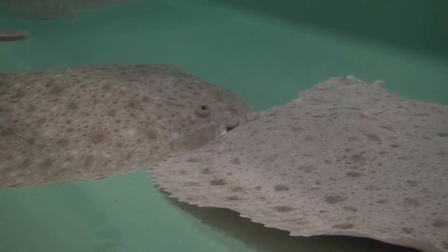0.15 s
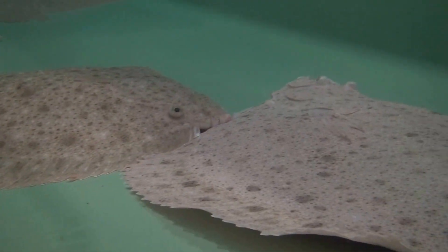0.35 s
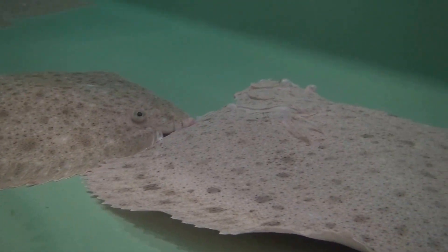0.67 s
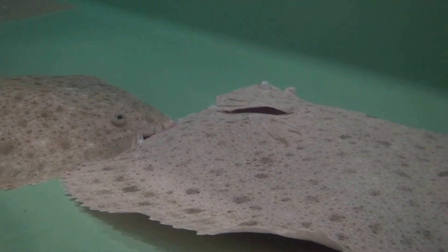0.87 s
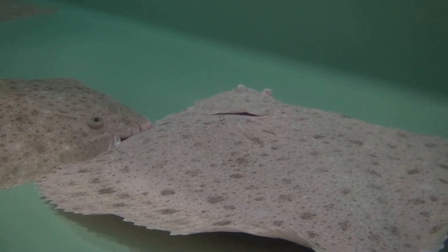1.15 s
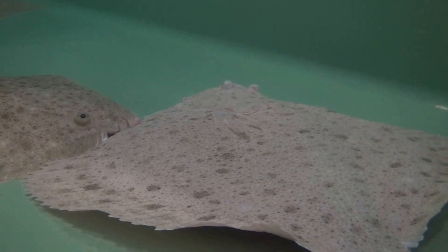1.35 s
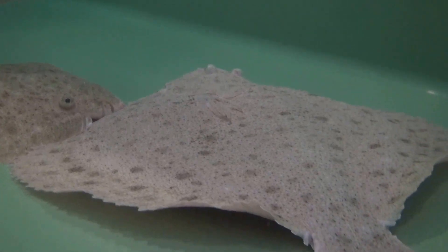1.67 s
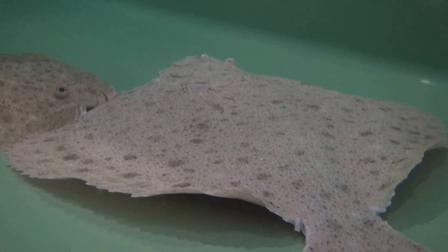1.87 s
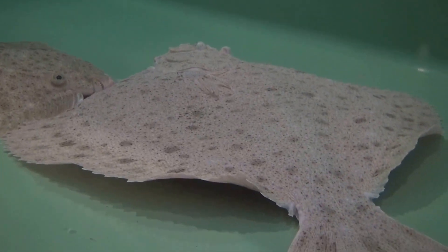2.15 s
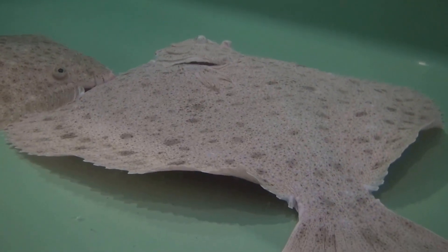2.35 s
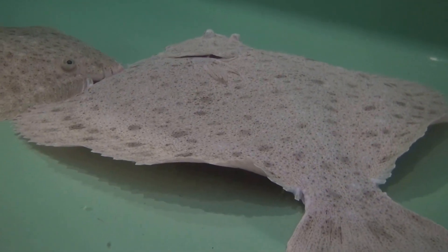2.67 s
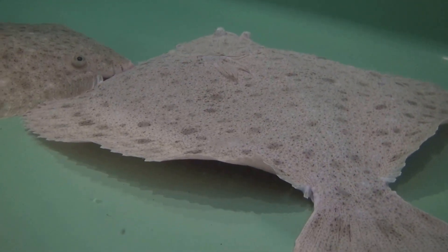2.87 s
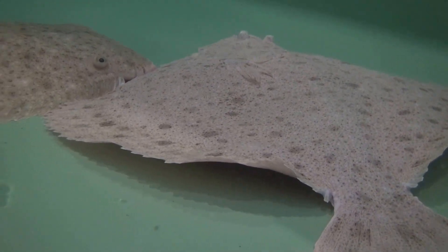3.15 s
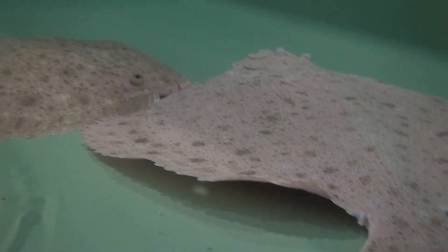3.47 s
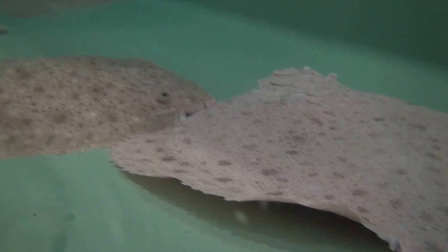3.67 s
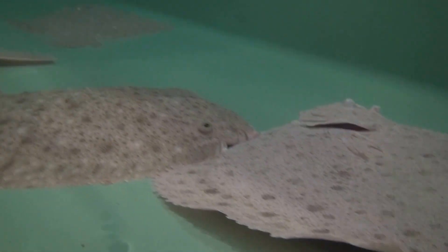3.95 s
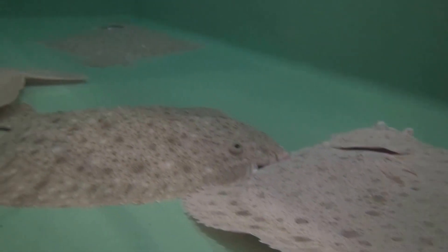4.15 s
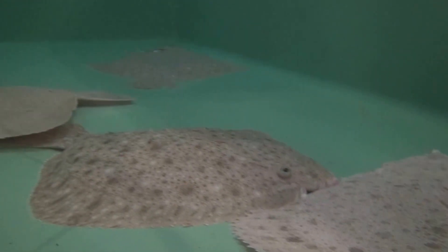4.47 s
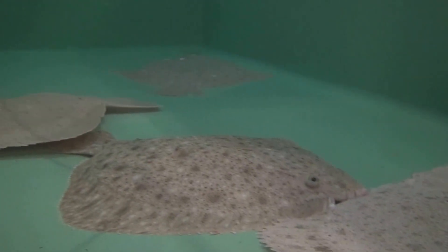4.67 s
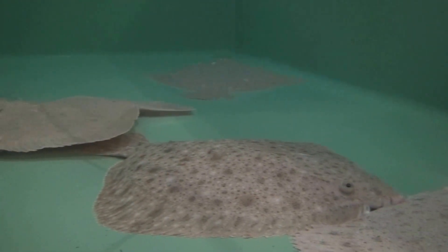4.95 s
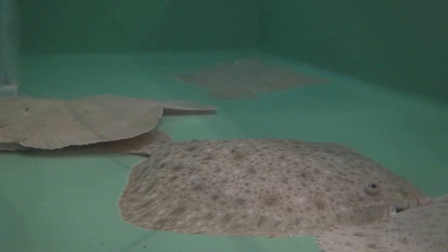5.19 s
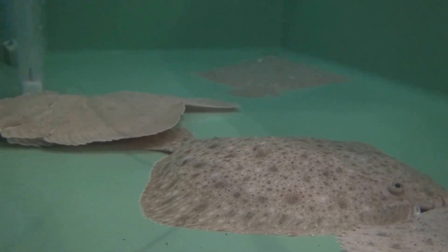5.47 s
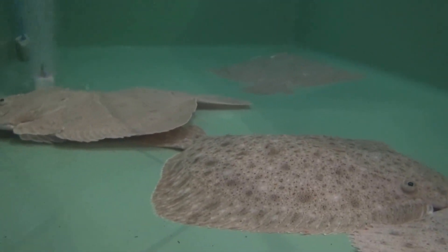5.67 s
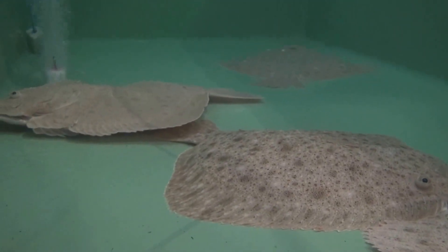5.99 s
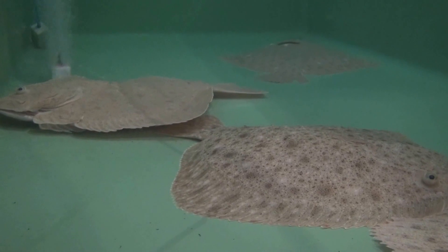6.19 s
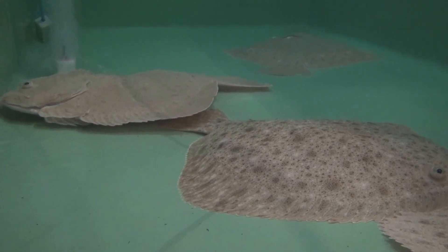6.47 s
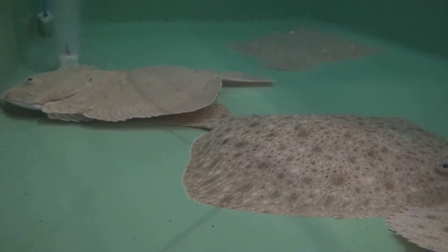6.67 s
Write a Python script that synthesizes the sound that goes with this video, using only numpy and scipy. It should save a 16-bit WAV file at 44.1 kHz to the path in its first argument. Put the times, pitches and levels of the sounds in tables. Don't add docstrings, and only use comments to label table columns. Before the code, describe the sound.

A nearly mono, close and muffled underwater sound inside an indoor fish tank, heard through a sealed housing. Deep uneven rumble and a wavering low pump hum run throughout, beneath gentle water hiss and a faint, very rapid mechanical ticking. From 0 to 1.3 seconds several dull, hollow knocks thud against the casing, each ringing low and briefly. From 1.3 to 2.9 it is calmer, the hum swelling and fading; the fine bubble fizz grows slightly near 2, and a bright plastic snap clicks at 2.6. Around 3.2 a second, weaker snap lands among renewed knocks, which crowd irregularly until about 5.5 as the rumble strengthens, then eases. From 5 to 6.2 a faint high ring flutters quickly. A last cluster of bumps comes around 5.9 to 6.3; the deepest heave fades, and the inflow rush grows nearer from 6.4 to the end at 6.8.

```python
import sys
import numpy as np
from scipy import signal
from scipy.fft import rfft, irfft, next_fast_len
from scipy.io import wavfile

SR = 44100
rng = np.random.default_rng(int(sys.argv[2]) if len(sys.argv) > 2 else 0)


def magnitude_from_level(level_db):
    exponent = np.asarray(level_db, float) / 20
    return 10 ** exponent


def inscribe(sig):
    pcm = np.round(np.clip(np.atleast_2d(sig).T, -1, 1) * 32767)
    wavfile.write(sys.argv[1], SR, pcm.astype(np.int16))


N = 301203

# (frequency [Hz], density [dB per Hz])
HEAVE_SPECTRUM = [(10, -40.5), (22, -13.5), (45, 0), (62, -4.5), (90, -27)]
# (frequency [Hz], density [dB per Hz])
SWAY_SPECTRUM = [(40, -29.5), (62, 2), (110, -2.5), (156, -0.5), (200, -8.5), (260, -37.5)]
# (frequency [Hz], density [dB per Hz])
SHELL_SPECTRUM = [(150, -31), (200, -9), (258, -3), (290, -5.5), (325, -2), (380, -29.5), (450, -52)]
# (frequency [Hz], density [dB per Hz])
UPPER_SPECTRUM = [(280, -33), (345, -0.5), (385, -2), (440, -8.5), (500, -20.5), (700, -52.5)]
# (frequency [Hz], density [dB per Hz])
WALL_SPECTRUM = [(350, -23), (450, 2), (600, -7.5), (900, -25), (1200, -45)]
# (time [s], sway level [dB])
STIR_CURVE = [(0.0, -34.5), (0.44, -36.5), (0.55, -38), (1.16, -42), (1.81, -40.5), (2.34, -44.5),
              (2.85, -37), (3.01, -39), (3.25, -35.5), (3.37, -34), (3.82, -33.5), (4.17, -36.5),
              (4.37, -40), (4.75, -37), (5.95, -37.5), (6.14, -36), (6.75, -38), (6.83, -38.5)]
# (time [s], jet level [dB])
INFLOW_CURVE = [(0, -68), (1.3, -61.5), (1.8, -64), (2.7, -72.5), (5.6, -61.5), (6, -61), (6.4, -52),
                (6.83, -52.5)]
# (frequency [Hz], level re twelfth order [dB], pitch wander [Hz])
PUMP_ORDERS = [(24.3, -7.5, 0.23), (218.4, -11, 0.76), (289.7, 3.5, 2.493)]
# (time [s], level [dB])
HUM_CURVE = [(0.1, -38), (1.1, -45), (1.43, -35), (1.84, -41), (2.13, -34.5), (2.47, -39.5), (2.79, -33),
             (2.95, -44), (3.31, -32), (3.5, -48), (3.82, -36), (4.32, -52.5), (4.57, -33.5), (4.89, -35),
             (5.3, -45), (5.65, -35), (6.26, -34.5), (6.45, -41.5)]
# (frequency [Hz], density [dB per Hz])
FLOW_SPECTRUM = [(350, -16.5), (600, -4.5), (889, -7.5), (1060, -2.5), (1210, -3), (1330, -7), (1640, -6),
                 (2010, -16.5), (2300, -18), (2990, -50.5), (5060, -120)]
# (frequency [Hz], density [dB per Hz])
FIZZ_SPECTRUM = [(1120, -29.5), (1900, -4), (2010, -18), (2530, -1), (2720, -6.5), (2920, -3.5), (3130, -7),
                 (3470, -1.5), (3990, -12.5), (4300, -12.5), (5590, -45), (9460, -120)]
# (frequency [Hz], density [dB per Hz])
AIR_SPECTRUM = [(2350, -35.5), (4000, -13), (4480, -7), (4880, 2), (5310, -6), (5900, 0.5), (6280, -2),
                (6650, -0.5), (7200, -3.5), (7700, -6), (8610, -12.5), (11000, -16.5), (15100, -18.5),
                (15600, -22)]
# (time [s], shell level [dB], sway level [dB])
INWARD_KNOCKS = [(0.0584, -10, -19.5), (0.2079, -8.5, -15.5), (0.3048, -22, -18.5), (0.557, -11, -16),
                 (1.2564, -8, -16.5), (3.4107, -20, -39), (3.8533, -26, -28), (3.9173, -18.5, -20),
                 (4.2256, -31, -22), (4.8717, -20, -21.5), (5.9303, -36, -19), (5.9777, -14.5, -32),
                 (6.2024, -15.5, -24), (6.2861, -21.5, -22)]
# (time [s], shell level [dB], sway level [dB])
OUTWARD_KNOCKS = [(0.0026, -19.5, -18.5), (0.8063, -19.5, -41), (0.83, -17, -42), (0.9717, -16, -15),
                  (2.9391, -22, -41), (3.2296, -11, -34), (3.2604, -16, -32), (3.2991, -10.5, -43),
                  (3.442, -18, -15), (3.4932, -9, -21), (3.5168, -17, -26), (3.632, -15, -27),
                  (3.7482, -17.5, -37), (3.967, -17.5, -28), (4.0568, -16, -29), (4.1674, -19.5, -20),
                  (4.201, -19.5, -39), (4.306, -15.5, -26), (4.5168, -15.5, -37), (4.5832, -16.5, -21),
                  (4.6898, -17, -24), (4.9257, -23, -27), (5.0216, -18.5, -18), (5.1938, -18.5, -20.5),
                  (5.2814, -17, -30), (5.5082, -14.5, -21), (6.1054, -25, -17), (6.1291, -21.5, -31),
                  (6.1515, -20, -22), (6.1785, -18.5, -44)]
# (frequency [Hz], level [dB], T60 [s])
HOUSING_EDGE_MODES = [(480, -15, .012), (760, -22, .008), (1100, -29, .008)]
# (time [s], peak level [dB])
TICK_CURVE = [(0, -52.5), (1, -53), (2.3, -49.5), (2.7, -60), (3.5, -51), (4.2, -56), (5, -54), (5.7, -50),
              (6.2, -54), (6.83, -56.5)]
# (frequency [Hz], level [dB], T60 [s])
CASING_MODES = [(5920, -2.5, 0.0059), (6760, -2.5, .007), (7200, -11.5, 0.0047), (8700, -16, 0.0041),
                (9550, -19, .008)]
# (time [s], peak level [dB])
SNAP_EVENTS = [
    (2.6081, -33),
    (3.2481, -39),
    (3.4484, -51),
    (5.9083, -51),
]
# (frequency [Hz], level [dB], T60 [s])
PLASTIC_MODES = [(3300, -20, .008), (4900, -8, .0035), (6300, 0, .0026), (9200, -9, .0017),
                 (14800, -23, .0012)]
# (frequency [Hz], density [dB per Hz])
WIDTH_SPECTRUM = [(18, -44), (30, -9.5), (70, -12), (189, -14), (282, -5.5), (479, -48), (816, -19),
                  (1160, -11.5), (1890, -29.5), (2640, -24), (4400, -36), (5370, -56), (6000, -40),
                  (7800, -67), (13200, -120)]


def rms_one(x):
    return x / np.sqrt(np.mean(x ** 2) + 1e-20)


def in_time(rows):
    s, *columns = np.transpose(rows)
    return [np.interp(np.arange(N) / SR, s, c) for c in columns]


def ramp(start_s, length_s):
    return np.clip((np.arange(N) / SR - start_s) / length_s, 0, 1)


def follows(base_db, per_sway, per_jet):
    calm_db, far_db = -38, -65
    sway_db, = in_time(STIR_CURVE)
    jet_db, = in_time(INFLOW_CURVE)
    return base_db + per_sway * (sway_db - calm_db) + per_jet * (jet_db - far_db)


def colour(x, points):
    size = next_fast_len(N)
    hz = np.maximum(np.arange(size // 2 + 1) * SR / size, 1)
    table_hz, table_db = np.transpose(points)
    gain_db = np.interp(np.log(hz), np.log(table_hz), table_db, left=-120, right=-120)
    return rms_one(irfft(rfft(x, size) * magnitude_from_level(gain_db), size)[:N])


def drift(rate_hz):
    r = np.exp(-80 * np.pi * rate_hz / SR)
    noise = rng.standard_normal(N // 40 + 2002)
    slow = signal.lfilter([1], [1, -2 * r, r * r], noise)[2000:]
    return np.interp(np.arange(N) / 40, np.arange(len(slow)), rms_one(slow))


def lumpy(points, lump_db, lump_rate):
    strength = magnitude_from_level(lump_db * drift(lump_rate))
    return colour(rng.standard_normal(N) * strength, points)


def clicks_at(seconds, sizes):
    out = np.zeros(N)
    places = np.round(np.asarray(seconds) * SR).astype(int)
    np.add.at(out, np.clip(places, 0, N - 1), sizes)
    return out


def ring(clicks, hz, t60):
    r, w = magnitude_from_level(-60 / (t60 * SR)), 2 * np.pi * hz / SR
    return signal.lfilter([0, np.sin(w)], [1, -2 * r * np.cos(w), r * r], clicks + 1e-18)


def swell(clicks, hz, t60):
    twice = ring(ring(clicks, hz, t60), hz, t60)
    return twice * 2 * np.e * np.log(1000) / (t60 * SR)


def strike(seconds, peak_db, modes, spread_db):
    chance = np.clip(rng.standard_normal((len(seconds), len(modes), 2)), -1.5, 1.5)
    out = np.zeros(N)
    for k, (hz, db, t60) in enumerate(modes):
        size = magnitude_from_level(peak_db + db + spread_db * chance[:, k, 0])
        out += ring(clicks_at(seconds, size * np.sign(chance[:, k, 1])), hz, t60)
    return out


def rumble():
    gust_db = 2.0 * drift(27)
    settle_db = 18 * ramp(5.5, 1)
    heave_db = follows(-41, 0.67, -.05) - settle_db + 0.54 * gust_db
    sway_db = in_time(STIR_CURVE)[0] + 2 - .15 * settle_db + gust_db
    shell_db = follows(-32, 0.39, 0.13) + 0.34 * gust_db
    upper_db = follows(-38.5, 0.33, 0.43) + 0.21 * gust_db
    wall_db = -47 + 0.32 * gust_db
    heave = magnitude_from_level(heave_db) * lumpy(HEAVE_SPECTRUM, lump_db=-0.5, lump_rate=9.7)
    sway = magnitude_from_level(sway_db) * lumpy(SWAY_SPECTRUM, lump_db=0.8, lump_rate=12)
    shell = magnitude_from_level(shell_db) * lumpy(SHELL_SPECTRUM, lump_db=0.8, lump_rate=66)
    upper = magnitude_from_level(upper_db) * lumpy(UPPER_SPECTRUM, lump_db=1.9, lump_rate=33)
    wall = magnitude_from_level(wall_db) * lumpy(WALL_SPECTRUM, lump_db=0.76, lump_rate=26)
    return heave + sway + shell + upper + wall


def pump():
    hum_db, = in_time(HUM_CURVE)
    out = np.zeros(N)
    for hz, db, wander_hz in PUMP_ORDERS:
        strength = np.sqrt(2) * magnitude_from_level(hum_db + db + 0.76 * drift(7.7))
        phase = 2 * np.pi * np.cumsum(hz + wander_hz * drift(3.86)) / SR
        out += strength * np.sin(phase)
    return out


def hiss():
    bubbles_db = 2.5 * ramp(1.7, .35)
    flow_db = follows(-52.5, .01, .1)
    fizz_db = follows(-67.5, .05, -.05) + bubbles_db
    flow = magnitude_from_level(flow_db) * lumpy(FLOW_SPECTRUM, lump_db=0.5, lump_rate=6.8)
    fizz = magnitude_from_level(fizz_db) * lumpy(FIZZ_SPECTRUM, lump_db=1.55, lump_rate=82)
    air = magnitude_from_level(-64.5) * lumpy(AIR_SPECTRUM, lump_db=.4, lump_rate=60)
    return flow + fizz + air


def jets():
    def resonance(hz, t60):
        return rms_one(swell(rng.standard_normal(N), hz, t60))

    jet = magnitude_from_level(in_time(INFLOW_CURVE)[0]) * resonance(1380, 0.0073)
    spray = magnitude_from_level(follows(-75, .01, 1.1)) * resonance(2400, 0.0019)
    whine_db = np.where(np.arange(N) / SR < 2.6, -84, -94.5)
    return jet + spray + magnitude_from_level(whine_db) * resonance(9600, .008)


def knocks():
    shell_hz, shell_t60_s, sway_hz, sway_t60_s = 285, .017, 105, .045
    bounce_s, bounce_db, sway_lag_s, edge_lag_s = .00525, -6, .0011, .0018
    s, shell_db, sway_db = np.transpose(np.vstack([INWARD_KNOCKS, OUTWARD_KNOCKS]))
    s = s + .0004
    way = np.repeat([1, -1], [len(INWARD_KNOCKS), len(OUTWARD_KNOCKS)])
    push = clicks_at(s, way * magnitude_from_level(shell_db))
    bounce = clicks_at(s + bounce_s, way * magnitude_from_level(shell_db + bounce_db))
    shell = magnitude_from_level(1.0) * swell(push - bounce, shell_hz, shell_t60_s)
    flex = clicks_at(s + edge_lag_s, way * magnitude_from_level(2.1 * shell_db + 4.5 + 2.5 * way))
    edge = np.zeros(N)
    for k, (hz, db, t60) in enumerate(HOUSING_EDGE_MODES):
        edge += (-1) ** (k + 1) * magnitude_from_level(db) * swell(flex, hz, t60)
    sway = ring(clicks_at(s + sway_lag_s, way * magnitude_from_level(sway_db + 4.5)), sway_hz, sway_t60_s)
    soft_contact = signal.butter(2, 1500, fs=SR, output="sos")
    t = np.arange(N) / SR
    earlier = magnitude_from_level(-24 - 60 * t / shell_t60_s) * np.cos(2 * np.pi * shell_hz * t)
    return earlier + signal.sosfilt(soft_contact, shell - sway + edge)


def mechanism_ticks():
    first_s, period_s = .01835, .0199972
    s = np.arange(first_s, N / SR, period_s)
    chance_db = 2 * np.clip(rng.standard_normal(len(s)), -1.5, 1.5)
    pair_db = 1.2 * (-1) ** np.arange(len(s))
    peak_db = np.interp(s, *np.transpose(TICK_CURVE)) + chance_db + pair_db
    ticks = strike(s, peak_db, CASING_MODES, spread_db=3.0)
    casing = signal.butter(2, [5500, 9900], "band", fs=SR, output="sos")
    return signal.sosfilt(casing, ticks)


def snaps():
    s, peak_db = np.transpose(SNAP_EVENTS)
    hits = clicks_at(s, magnitude_from_level(peak_db)) + clicks_at(s + .0017, magnitude_from_level(peak_db - 14))
    return sum(magnitude_from_level(db) * swell(hits, hz, t60) for hz, db, t60 in PLASTIC_MODES)


def passing_ring():
    ring_hz, ring_t60_s = 2188, .036
    first_s, period_s, jitter_s = 4.986, .03993, .001
    turn = np.delete(np.arange(30), [3, 18, 22])
    late, strong = rng.standard_normal((len(turn), 2)).T
    crest_s = first_s + period_s * turn + jitter_s * late
    peak_db = -55 - 3 * np.abs(crest_s - 5.5) + .8 * strong
    touch_s = crest_s - ring_t60_s / np.log(1000)
    return swell(clicks_at(touch_s, magnitude_from_level(peak_db - 1.5)), ring_hz, ring_t60_s)


def scene():
    body = rumble() + knocks()
    water = hiss() + jets()
    cracks = snaps()
    mid = body + pump() + water + mechanism_ticks() + cracks + passing_ring()
    late = magnitude_from_level(-33.0) * np.roll(body, 75) + magnitude_from_level(-20) * np.roll(cracks, 4)
    flow_band = signal.butter(1, [800, 1700], "band", fs=SR, output="sos")
    lean = magnitude_from_level(-24) * signal.sosfilt(flow_band, water)
    side = magnitude_from_level(-68) * lumpy(WIDTH_SPECTRUM, lump_db=0.5, lump_rate=8) + late - lean
    return np.array([mid + side, mid - side])


def roll_off(x):
    return signal.sosfilt(signal.butter(12, 15700, fs=SR, output="sos"), x)


def record(dry):
    top = signal.cheby2(16, 50, 15900, fs=SR, output="sos")
    self_noise = magnitude_from_level(-77) * signal.sosfilt(top, rng.standard_normal(N))
    return roll_off(dry + self_noise)


dry = scene()
out = record(dry)
inscribe(out)
```